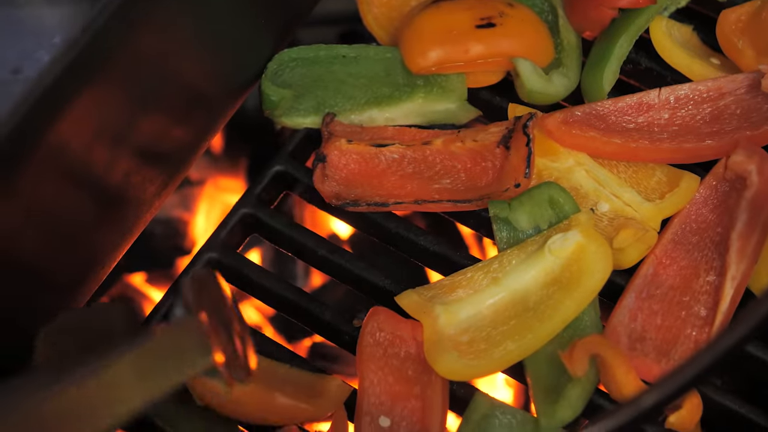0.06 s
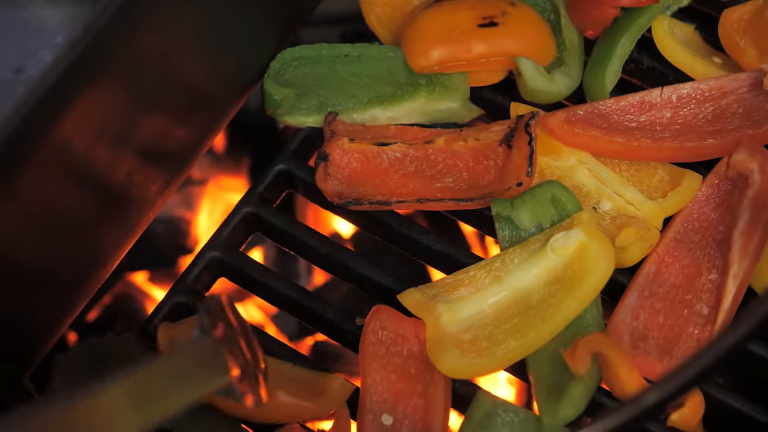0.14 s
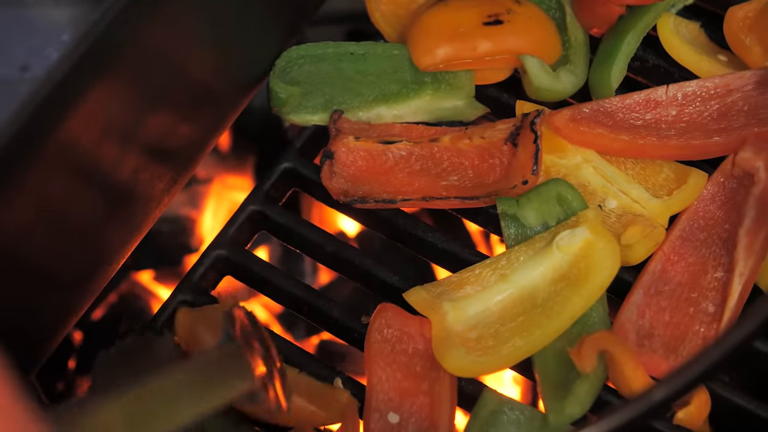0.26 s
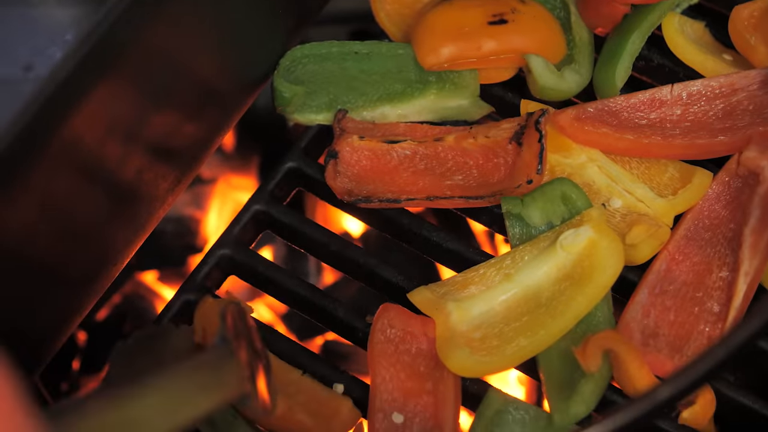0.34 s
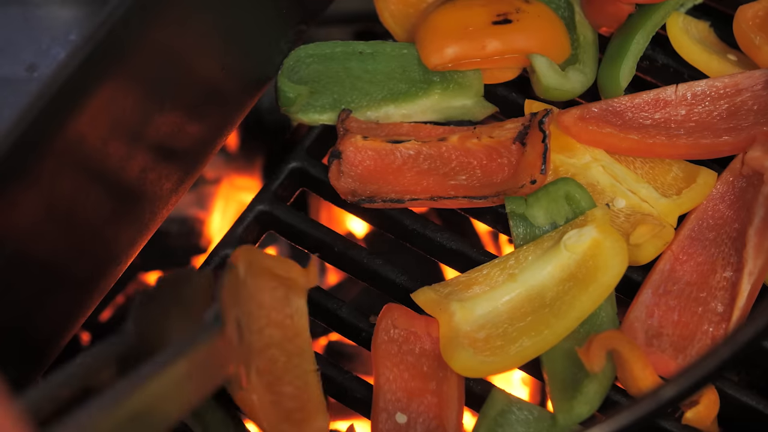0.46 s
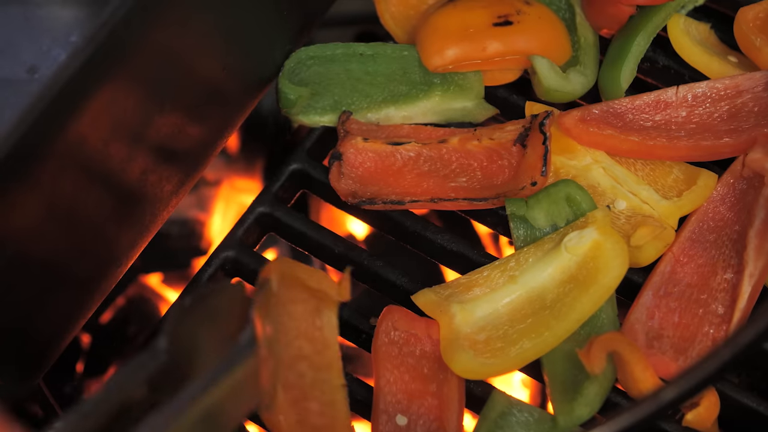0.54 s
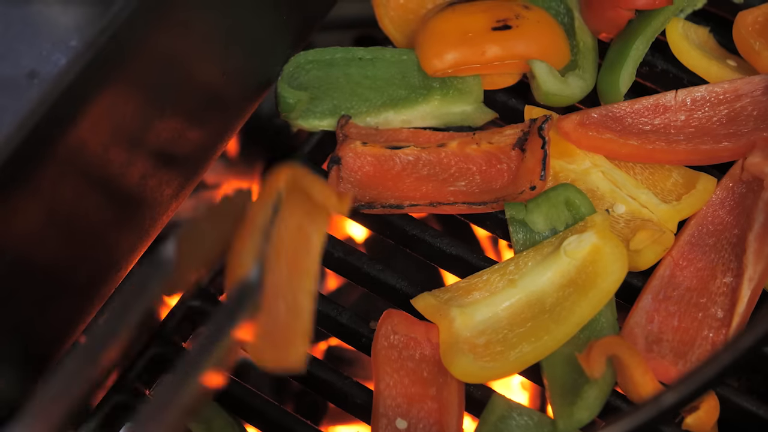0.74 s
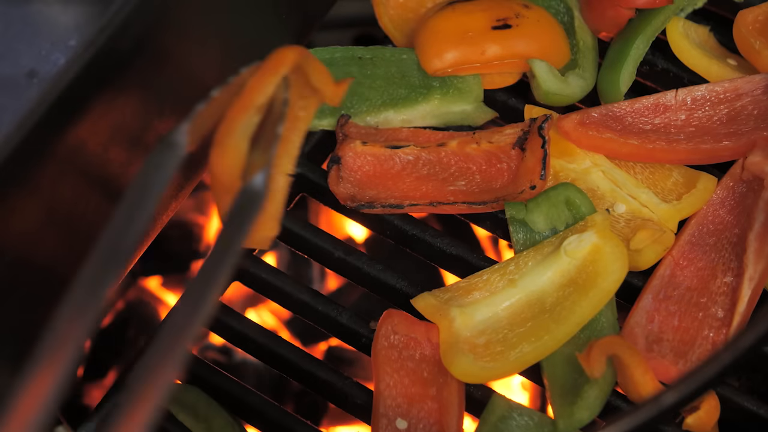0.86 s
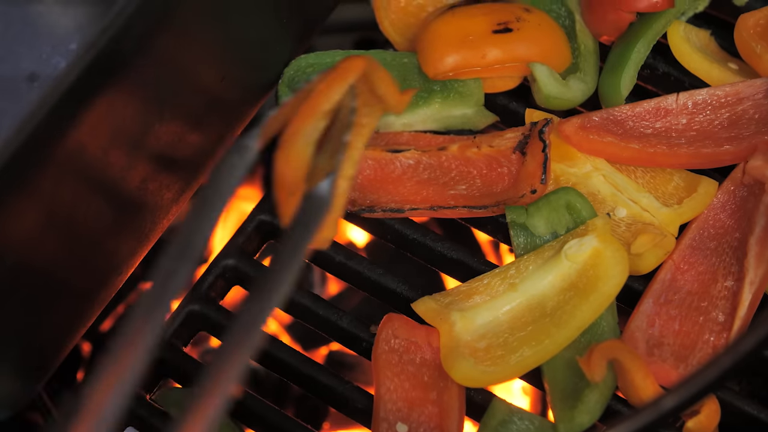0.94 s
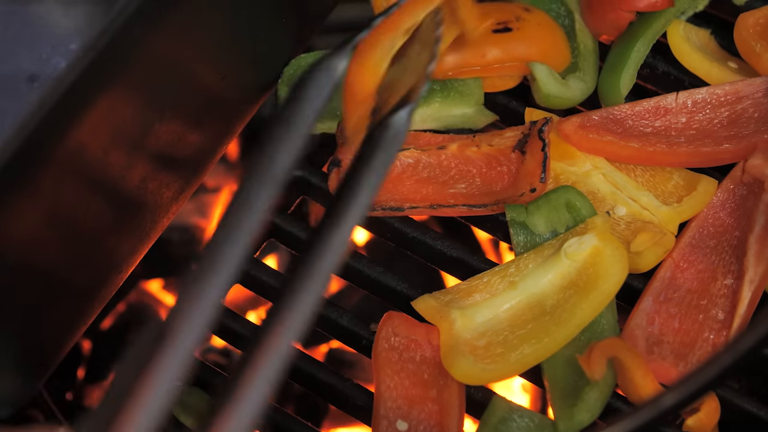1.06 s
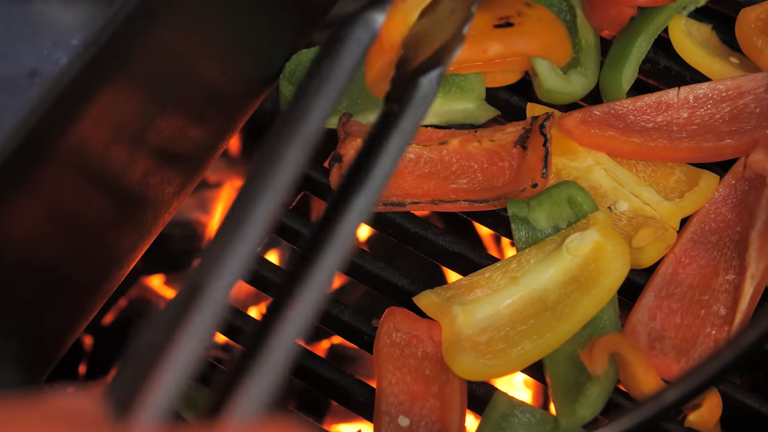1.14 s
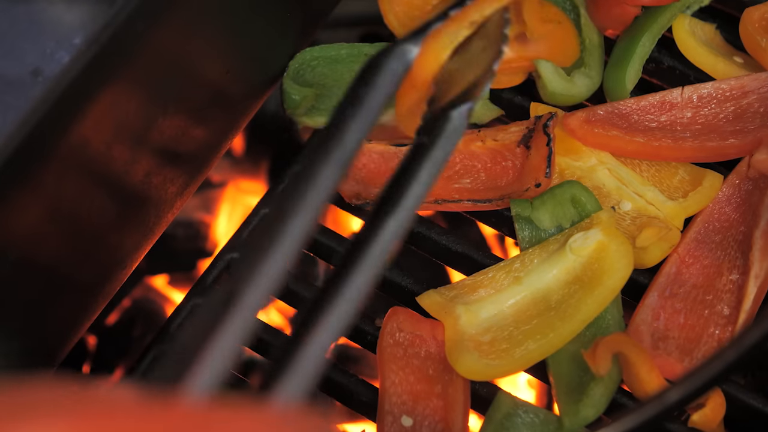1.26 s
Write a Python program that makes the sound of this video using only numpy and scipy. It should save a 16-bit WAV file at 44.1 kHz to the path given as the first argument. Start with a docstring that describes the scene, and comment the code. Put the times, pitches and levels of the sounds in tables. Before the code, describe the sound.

Metal tongs knock once on a grill grate with a low, briefly ringing clank. Two sharp ticks follow, then a soft scuff. Peppers sizzle faintly over a soft rush of fire and a low hum, close by outdoors.

```python
"""Metal tongs knock once on a hot grill grate: they chatter for a moment, and the grate and its
steel bowl ring with a low clank. Two sharp ticks follow. Peppers sizzle and spit faintly as their
juice meets the hot bars, and the tongs scuff once as they lift a slice.
Under it all the fire rushes softly in the bowl, over a low mains hum."""
import sys
import numpy as np
from scipy import signal
from scipy.fft import rfft, irfft, next_fast_len
from scipy.io import wavfile
from scipy.ndimage import map_coordinates

SR = 44100
rng = np.random.default_rng(int(sys.argv[2]) if len(sys.argv) > 2 else 0)


def generate_wav(sig):
    """Save sig (samples, or channels by samples) to the path in sys.argv[1] as 16-bit PCM at SR."""
    pcm = np.round(np.clip(np.atleast_2d(sig).T, -1, 1) * 32767).astype(np.int16)
    wavfile.write(sys.argv[1], SR, pcm)


N = 57330
TOP_HZ = 15950  # the highest pitch kept


def tongs_knock():
    """The tongs land and set the grate ringing; each touch adds a thud, a crack and a clatter."""
    # The quick touches within the one knock. Each row: start in seconds, relative level in dB.
    touches = [(0.2475, 1), (.2540, -2), (0.2614, 0.5), (.2778, -8), (0.2816, -9.5)]
    # The tone of the crack of metal on metal. Each row: pitch in Hz, relative level in dB.
    crack_tone = [(250, -42), (450, 3), (1400, -5), (3000, -2), (6000, -11.5), (8000, -20), (15000, -35)]
    # The tone of the tips brushing the bar just before. Each row: pitch in Hz, relative level in dB.
    brush_tone = [(300, -34), (1200, 3), (5500, -3.5), (8000, -12.5), (15000, -22)]
    ring = grate_ring(start=touches[0][0])
    brush = amp(-37) * noise(brush_tone) * fade(since(0.2447), rise=0.00042, ring_time=0.1)
    blows, crack_level = np.zeros(N), np.zeros(N)
    for start, db in touches:
        blows[round(start * SR)] += amp(db)
        crack_level += amp(db - 30.5) * fade(since(start), rise=0.00042, ring_time=0.015)
    cracks = crack_level * noise(crack_tone)
    t = since(0)
    thud_hz, thud_seconds = 507, 0.0062
    push = np.sin(np.pi * np.minimum(t / thud_seconds, 1))
    thud = amp(-21.5) * np.sin(2 * np.pi * thud_hz * t) * push
    # Convolving places a copy of the sound at every blow.
    thuds = signal.fftconvolve(blows, thud)[:N]
    clatters = amp(-30.5) * signal.fftconvolve(blows, bowl_clatter())[:N]
    return ring + brush + cracks + thuds + clatters


def grate_ring(start):
    """The struck grate rings in its bowl with many notes at once; close pairs make the sound pulse."""
    # The grate's main notes. Each row: pitch in Hz, relative level in dB, ring time in seconds.
    notes = [(160, -46, .75), (248, -46, 1.15), (260, -51, 1.15), (404, -30.5, .52), (453, -26, .28),
             (464, -38, .55), (497, -30, .3), (571, -32, .52), (615, -32, .55), (706, -29, .47),
             (877, -33, .31), (1027, -41, .44), (1235, -35, .25), (1297, -36, .23), (1447, -31, .22),
             (1634, -31.5, .23), (1916, -40, .5), (2051, -39.5, .46), (2148, -35, .24), (2688, -40, .38),
             (3103, -44, .3), (3246, -38.5, .32), (4510, -42, .17), (5017, -44, .18), (5260, -45, .17),
             (5636, -44, .2), (7900, -51, .18)]
    age = since(start)
    ring = np.zeros(N)
    for hz, db, ring_time in notes:
        wave = np.sin(2 * np.pi * (hz * age + rng.random()))
        ring += amp(db + 1) * wave * fade(age, rise=0.0035, ring_time=ring_time)
    return ring


def bowl_clatter():
    """One blow shakes a crowd of weak notes from the sheet metal; each band dies at its own speed."""
    # The tone of the sheet metal. Each row: pitch in Hz, relative level in dB.
    metal_tone = [(90, -36), (150, -12), (200, -12), (320, -22), (430, -5.5), (600, -4.5), (780, -10.5),
                  (1080, -6), (1350, -6), (1800, -12.5), (3200, -16), (5500, -21.5), (7500, -33),
                  (10000, -36.5), (15000, -45)]
    # How long the metal rings. Each row: pitch in Hz, ring time in seconds.
    ring_times = [(150, 0.62), (500, 0.31), (1400, .25), (2500, 0.33), (5000, 0.21), (12000, 0.45)]
    t = np.arange(2 ** 15) / SR
    hz = np.fft.rfftfreq(len(t), 1 / SR)
    phases = np.exp(2j * np.pi * rng.random(len(hz)))
    crowd = unit(irfft(amp(value_at(metal_tone, hz)) * phases))
    spectrum = rfft(crowd)
    edges = np.geomspace(60, TOP_HZ, 23)
    clatter = np.zeros(len(t))
    for low, high in zip(edges, edges[1:]):
        band = irfft(spectrum * (hz >= low) * (hz < high))
        ring_time = value_at(ring_times, np.sqrt(low * high))
        clatter += band * fade(t, rise=0.0017, ring_time=ring_time)
    return clatter


def ticks():
    """Each sharp tick or faint spit is a very short ping inside a snap of noise around its pitch."""
    # The ticks. Each row: start in seconds, relative level in dB, pitch in Hz, ring time in seconds.
    events = [(0.1016, -50, 5500, 0.0074), (0.3585, -45, 6700, 0.014), (0.3644, -29, 6540, 0.0052),
              (0.3741, -28.5, 6440, .004), (0.4353, -49, 6030, .008), (0.9013, -40.5, 4440, 0.0076),
              (.9265, -53, 5240, 0.0056), (0.968, -46.5, 4420, 0.0073), (.9690, -48, 5290, 0.0093)]
    # The tone of the snap. Each row: multiple of the tick's pitch, relative level in dB.
    snap_tone = [(.4, -24), (.75, -11.5), (1, 0), (1.15, -7), (1.32, -12), (1.65, -7.5), (2.3, -21),
                 (3.5, -28)]
    sound = np.zeros(N)
    for start, db, hz, ring_time in events:
        t = since(start)
        ping = amp(-2) * np.sin(2 * np.pi * hz * t)
        snap = amp(-1.5) * noise([(hz * multiple, level) for multiple, level in snap_tone])
        sound += amp(db) * (ping + snap) * fade(t, rise=0.00033, ring_time=ring_time)
    return sound


def pepper_sizzle():
    """Juice hisses on the hot bars, with short spurts of steam and tiny bursting bubbles."""
    # The spurts of steam. Each row: time of the peak in seconds, level in dB, width in seconds.
    spurts = [(0.414, -61, 0.034), (0.482, -59, .015), (0.645, -62, 0.035), (.694, -58, 0.0064),
              (0.72, -61, .003), (.748, -57.5, 0.0034), (0.794, -56, 0.0035), (.969, -56.5, 0.0036),
              (1.135, -62, .003)]
    # The bright tone of the sizzle. Each row: pitch in Hz, relative level in dB.
    sizzle_tone = [(1500, -31), (3500, -9), (6000, -5), (9800, 0.5), (13000, -1), (16000, -3.5)]
    t = since(0)
    hiss = amp(-64.5 + 0.4 * wobble(per_second=40.5)) * noise(sizzle_tone)
    steam_level = sum(amp(db) * np.exp(-0.5 * ((t - peak) / width) ** 2) for peak, db, width in spurts)
    steam = steam_level * noise(sizzle_tone)
    pops_per_second = 180
    pops = rng.random(N) < pops_per_second / SR
    pop_sizes = amp(2 * np.minimum(rng.exponential(size=N), 4))
    crackle = filtered(pops * pop_sizes, lambda hz: amp(value_at(sizzle_tone, hz)))
    return hiss + steam + amp(-68.5) * unit(crackle)


def tongs_scuff():
    """The tongs rub softly as they lift a slice."""
    # The tone of the rub. Each row: pitch in Hz, relative level in dB.
    rub_tone = [(400, -9), (650, -9), (1000, -18), (1600, -2), (2100, -15), (5000, -31)]
    return amp(-52) * noise(rub_tone) * fade(since(0.795), rise=0.0034, ring_time=0.22)


def fire():
    """The flames rush unevenly and keep the air in the hollow bowl sounding."""
    # The low rush of the flames. Each row: pitch in Hz, relative level in dB.
    flame_tone = [(20, -13), (45, -7), (75, -7), (105, -2), (150, -8), (300, -9.5), (400, -6), (520, -6),
                  (680, -6.5), (850, -7), (1060, -14), (1500, -14), (2900, -22), (8000, -36), (12000, -53)]
    # The notes of the air in the bowl. Each row: pitch in Hz, width in Hz, typical level in dB.
    air_notes = [(533.6, 10.5, -69), (612.6, 16, -62.5), (713, 12.4, -64.5), (807.5, 8.4, -66.5),
                 (1232.5, 8, -70.5), (1463, 44, -72)]
    hollow = np.zeros(N)
    for pitch, width, db in air_notes:
        note = filtered(rng.standard_normal(N), lambda hz: 1 / (1 + ((hz - pitch) / width) ** 2))
        hollow += amp(db) * unit(note)
    flicker = amp(1.25 * wobble(per_second=14.4))
    rush = amp(-56.5) * noise(flame_tone)
    return flicker * (rush + hollow)


def mains_hum(hz=59.9):
    """Mains electricity hums on one low, steady note."""
    return amp(-57.5) * unit(np.sin(2 * np.pi * hz * since(0)))


def amp(db):
    """Turn decibels into a number to multiply by."""
    return 10 ** (np.asarray(db) / 20)


def unit(x):
    """Scale a sound to an average (rms) level of 1."""
    return x / np.sqrt(np.mean(x ** 2) + 1e-20)


def value_at(points, hz):
    """Read between rows of (pitch in Hz, value), spacing the pitches as the ear does."""
    pitches, values = np.transpose(points)
    return np.interp(np.log(hz + 1), np.log(pitches + 1), values)


def since(start):
    """Seconds since a moment, zero before it."""
    return np.maximum(np.arange(N) / SR - start, 0)


def fade(t, rise, ring_time):
    """Rise quickly, then die away by 60 dB every ring_time; all times are in seconds."""
    return (1 - np.exp(-t / rise)) * np.exp(-np.log(1000) * t / ring_time)


def wobble(per_second):
    """A smooth curve through this many random values a second."""
    return map_coordinates(rng.standard_normal(N // 50), [np.arange(N) * per_second / SR], mode="mirror")


def filtered(x, gain_at):
    """Turn each pitch in a sound up or down by gain_at(hz)."""
    size = next_fast_len(N + SR // 2)
    return irfft(rfft(x, size) * gain_at(np.fft.rfftfreq(size, 1 / SR)), size)[:N]


def noise(tone):
    """Noise at level 1, shaped by rows of (pitch in Hz, relative level in dB)."""
    return unit(filtered(rng.standard_normal(N), lambda hz: amp(value_at(tone, hz))))


def scene():
    """All the sounds together in one channel, close by in the open air."""
    return (tongs_knock() + ticks() + pepper_sizzle() + tongs_scuff() + fire() + mains_hum())[None]


def record(dry):
    """Cut away the very highest treble."""
    return filtered(dry[0], lambda hz: hz < TOP_HZ)[None]


dry = scene()
out = record(dry)
generate_wav(out)
```